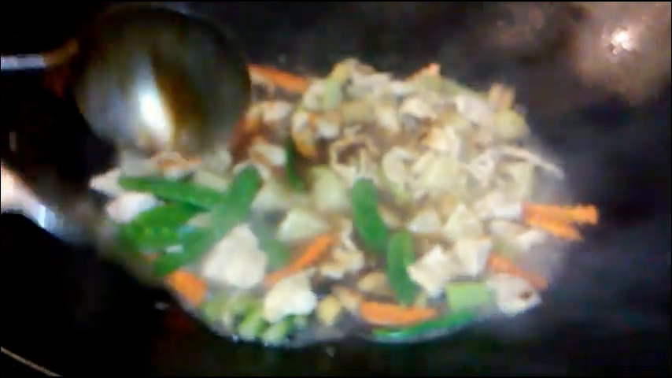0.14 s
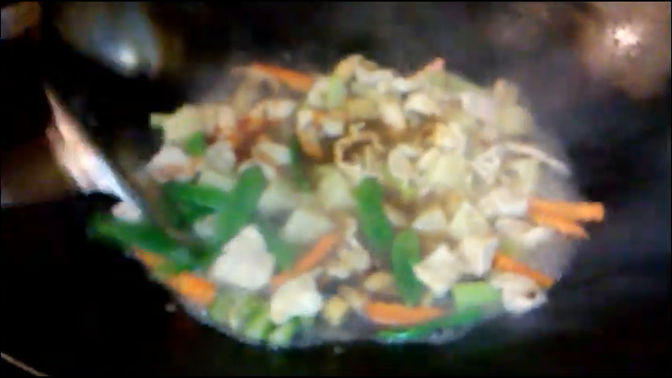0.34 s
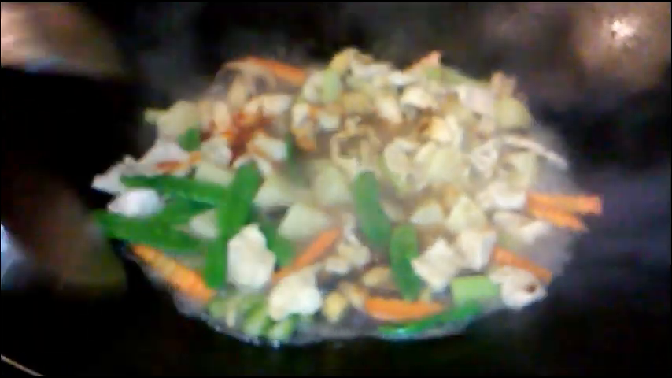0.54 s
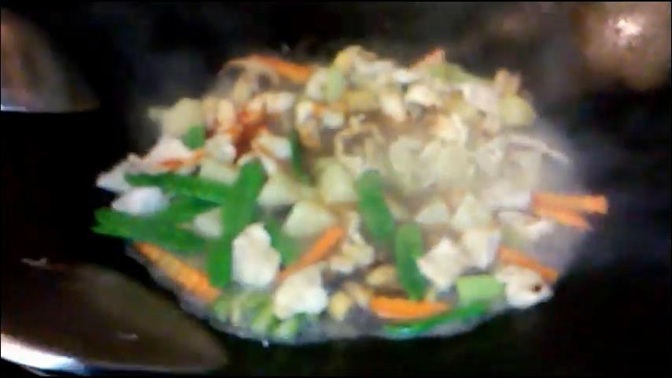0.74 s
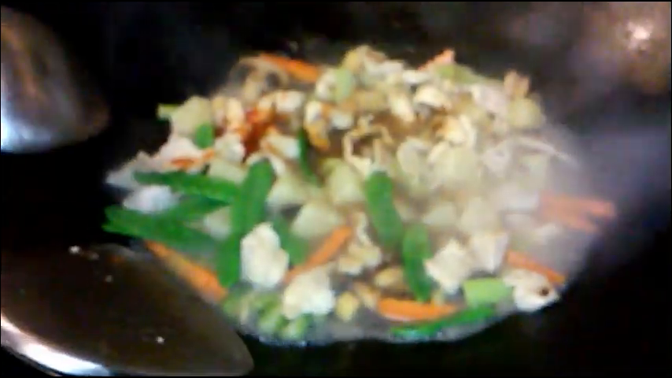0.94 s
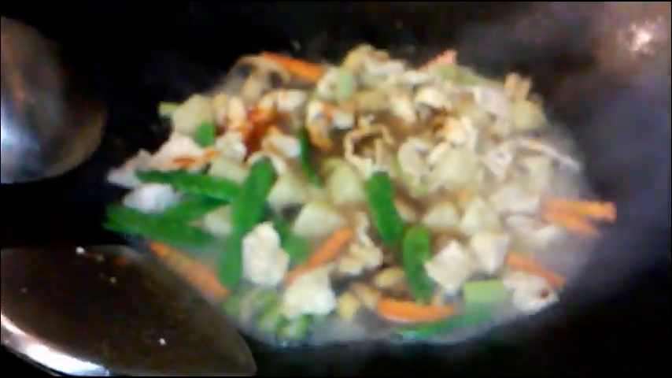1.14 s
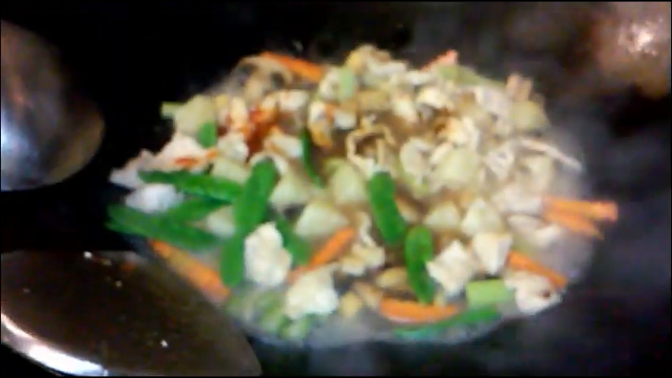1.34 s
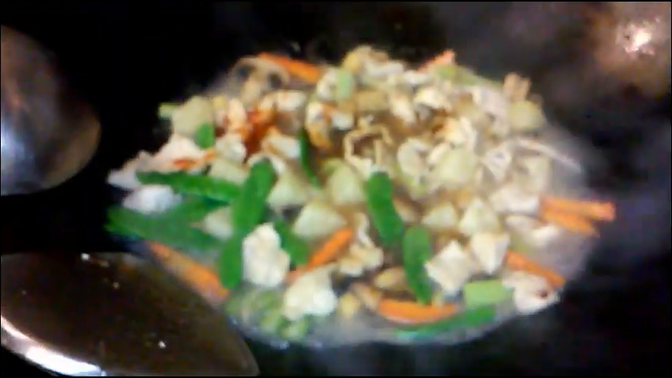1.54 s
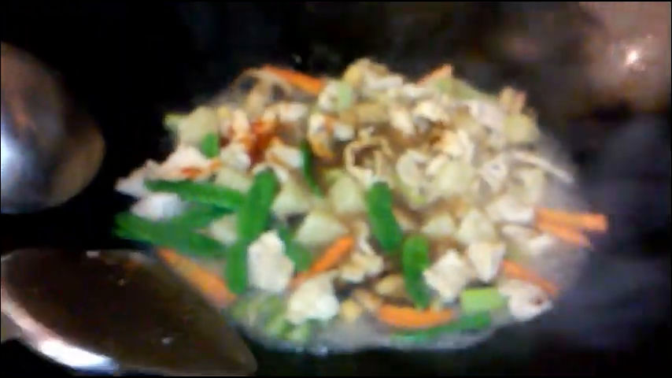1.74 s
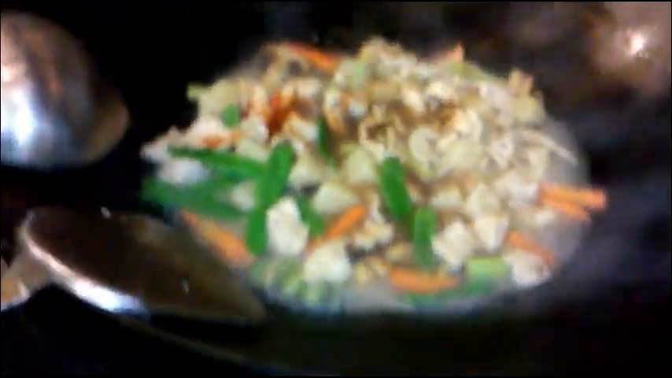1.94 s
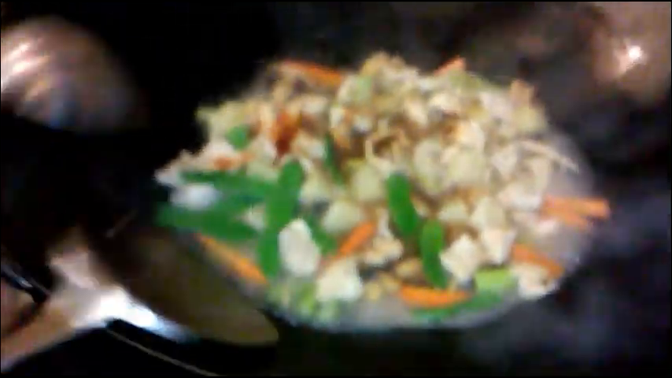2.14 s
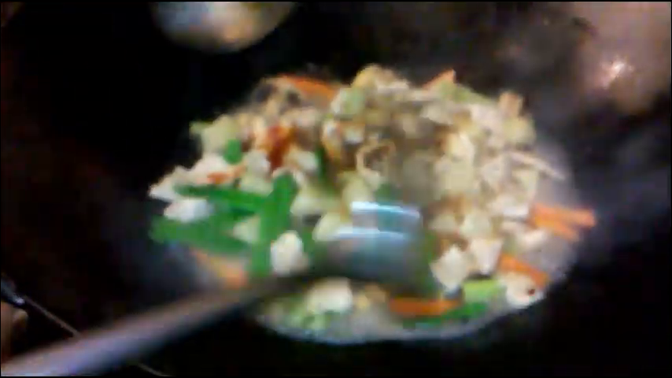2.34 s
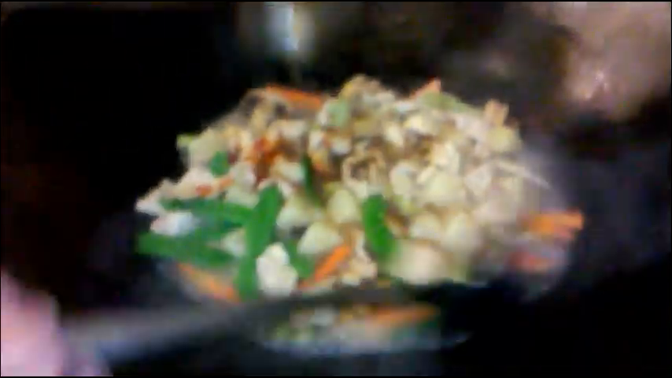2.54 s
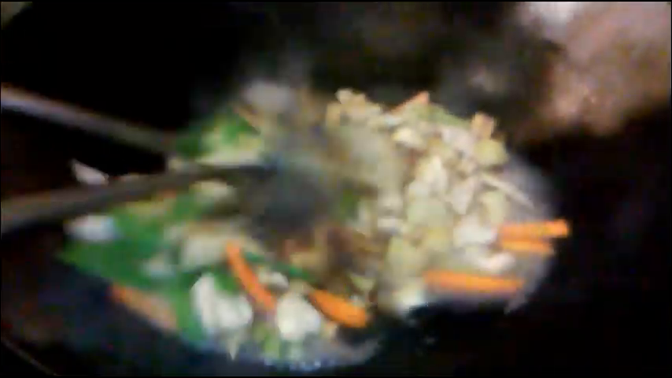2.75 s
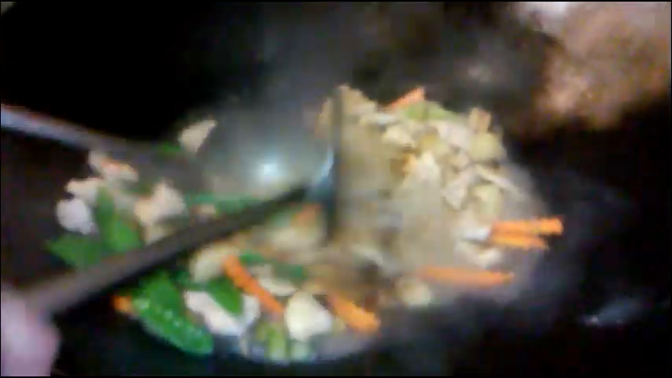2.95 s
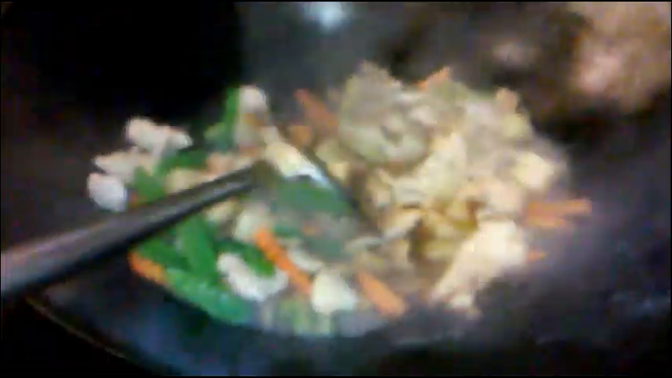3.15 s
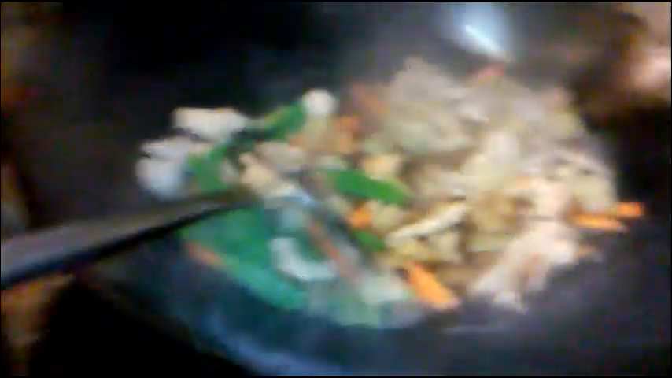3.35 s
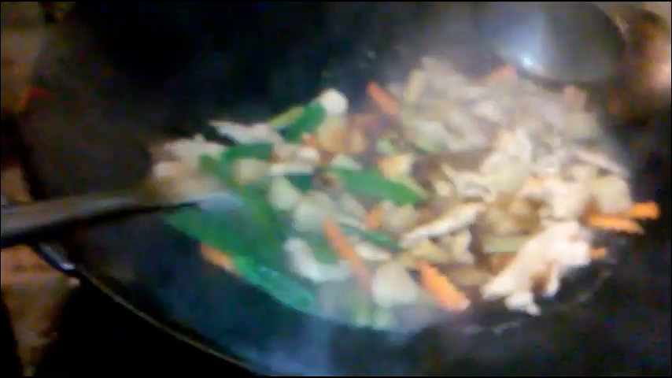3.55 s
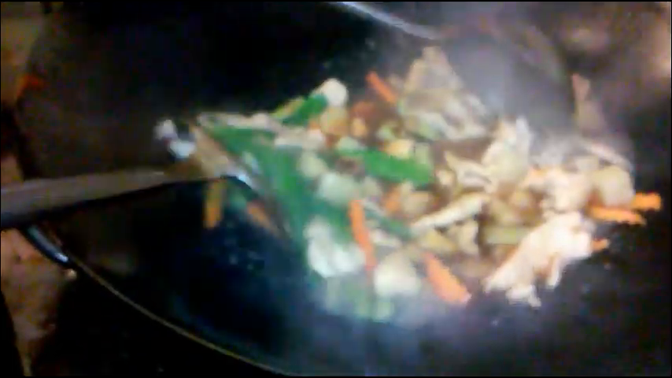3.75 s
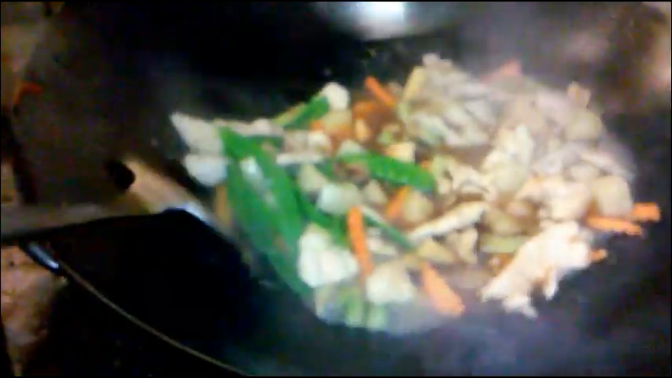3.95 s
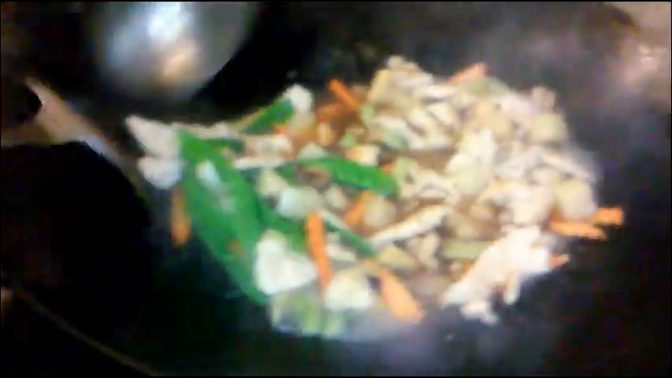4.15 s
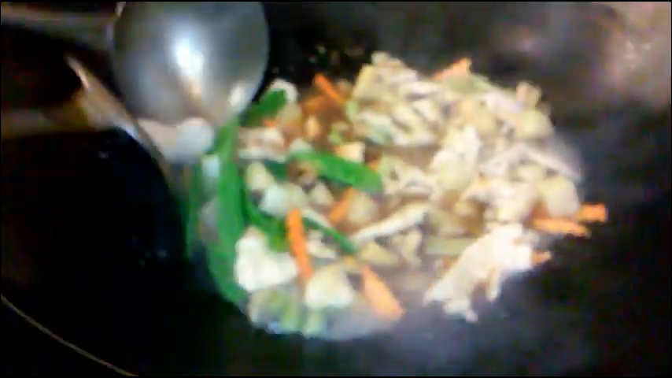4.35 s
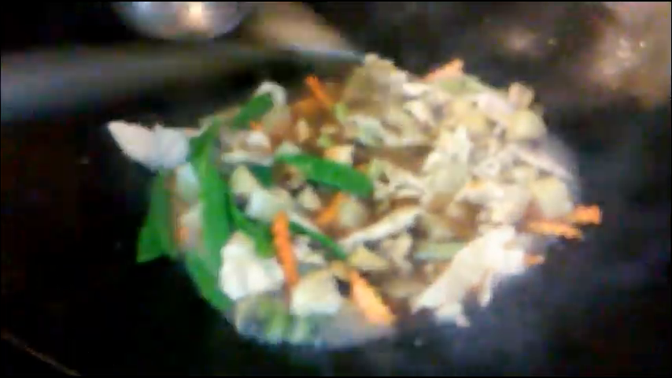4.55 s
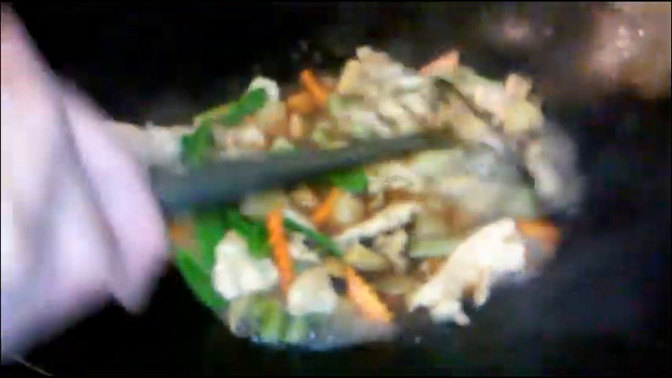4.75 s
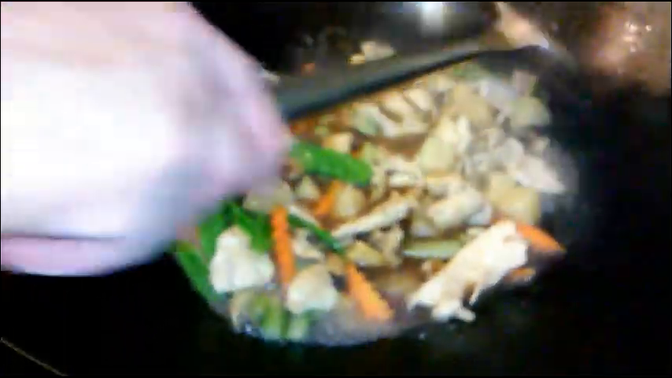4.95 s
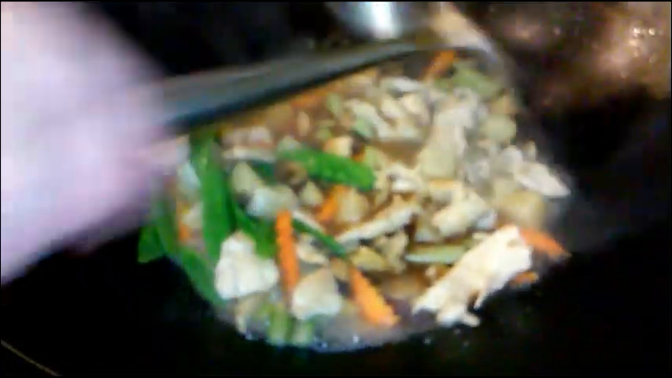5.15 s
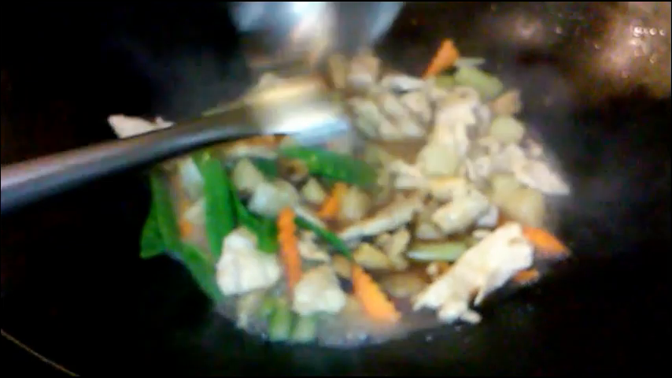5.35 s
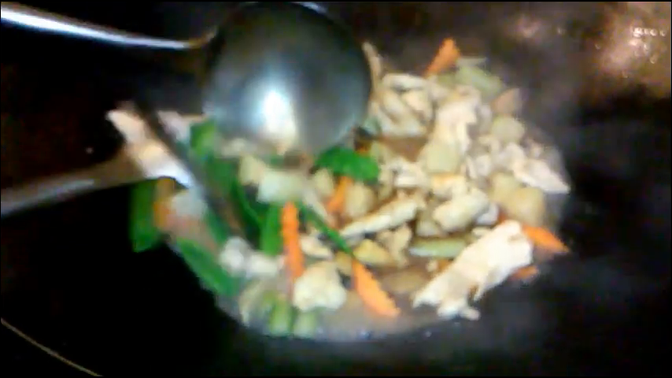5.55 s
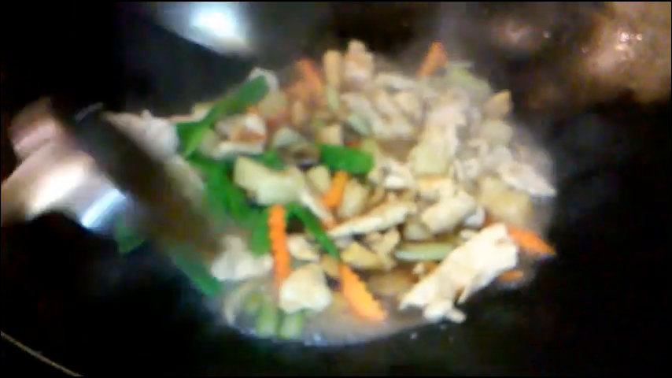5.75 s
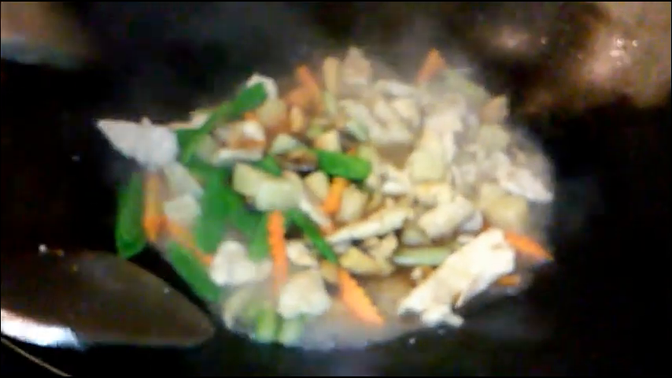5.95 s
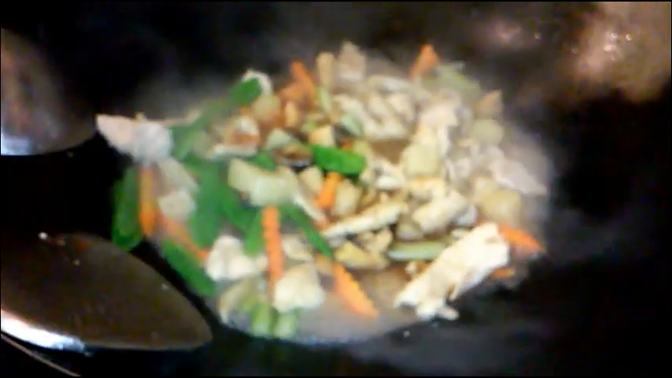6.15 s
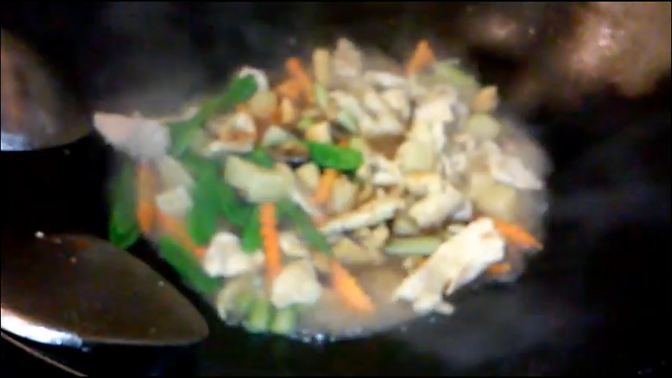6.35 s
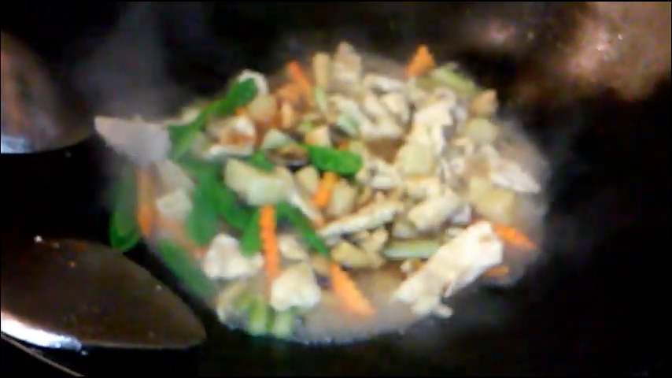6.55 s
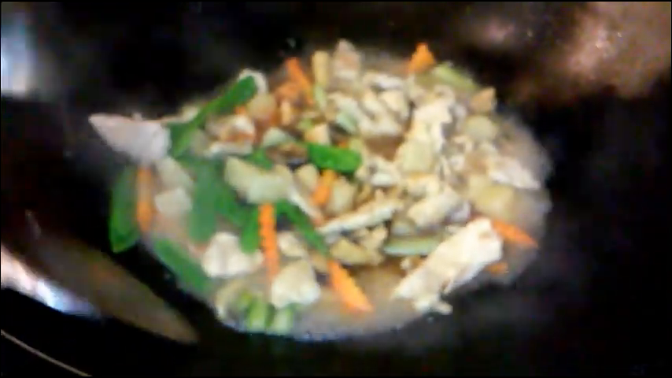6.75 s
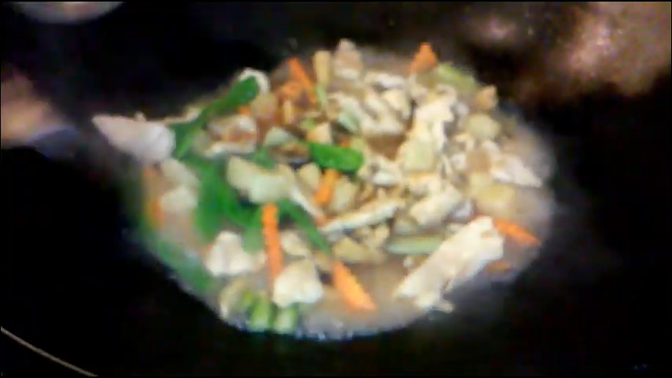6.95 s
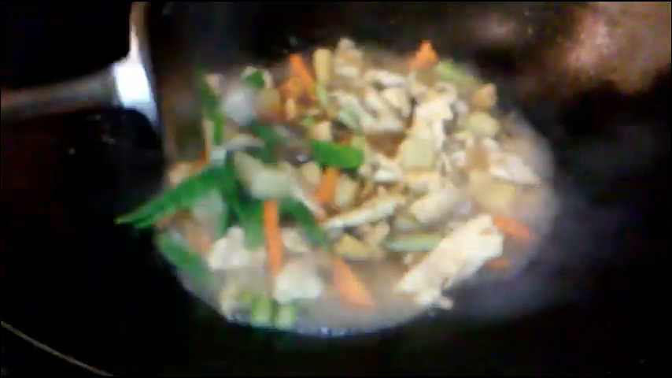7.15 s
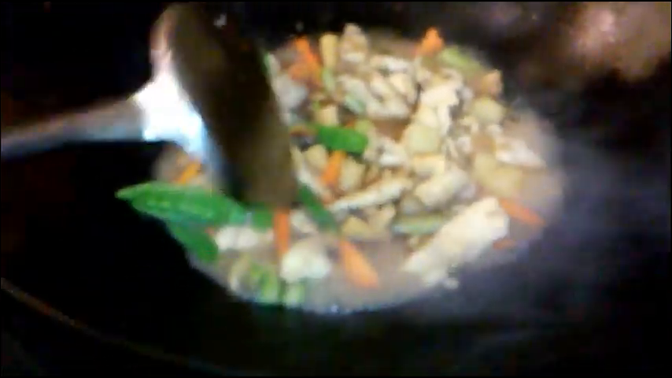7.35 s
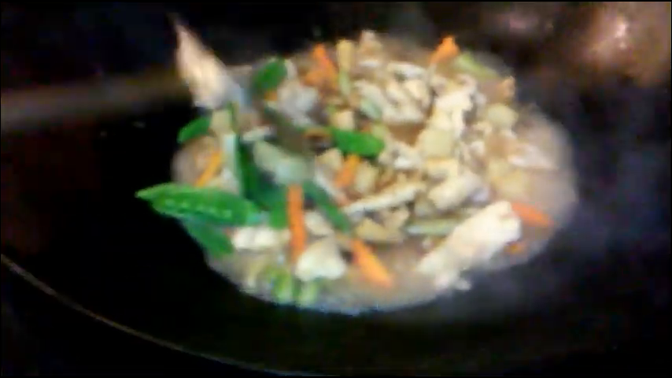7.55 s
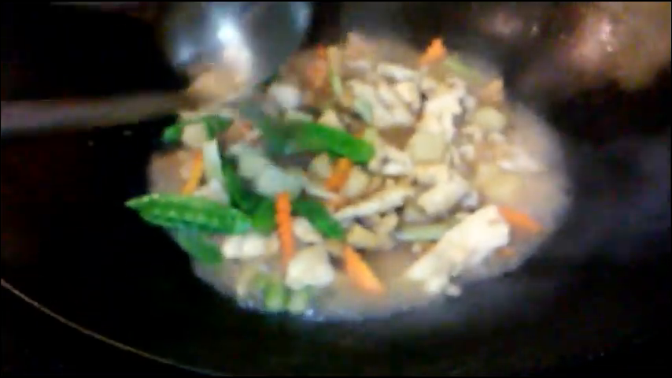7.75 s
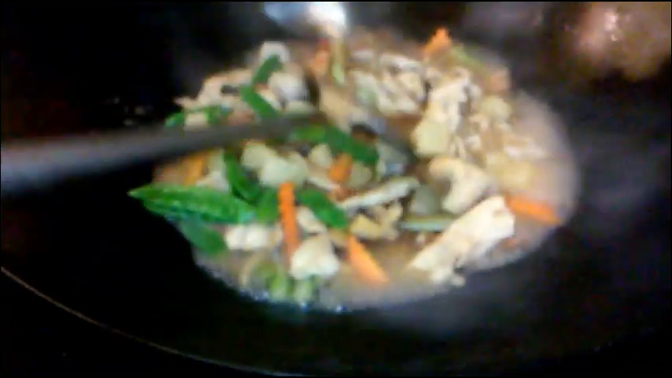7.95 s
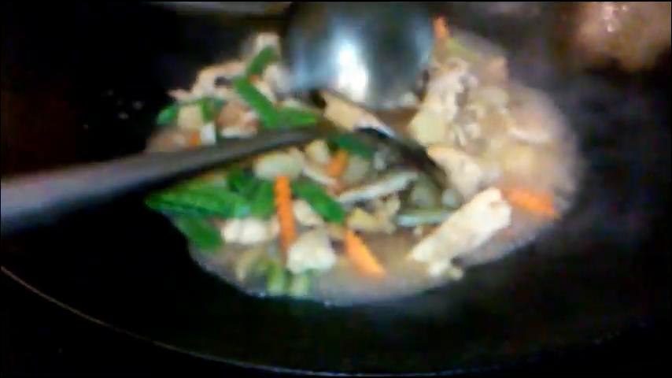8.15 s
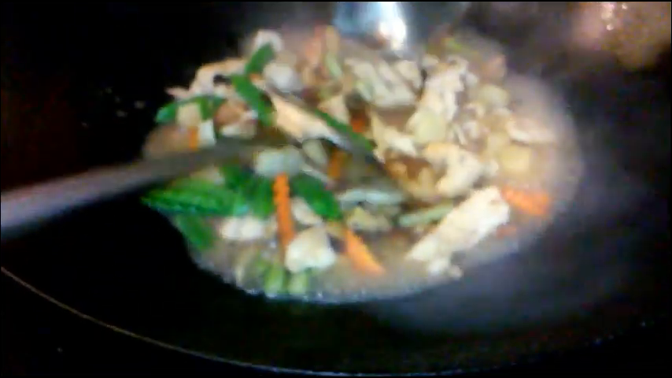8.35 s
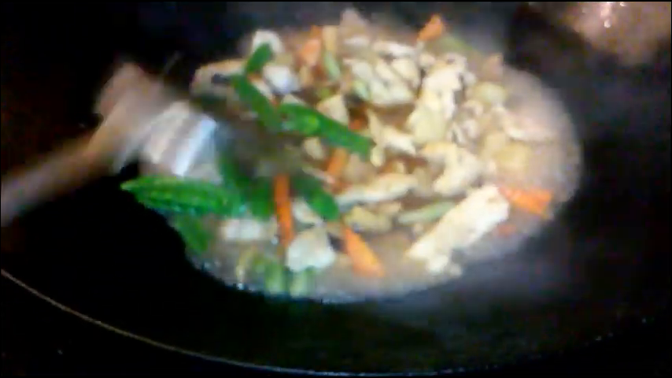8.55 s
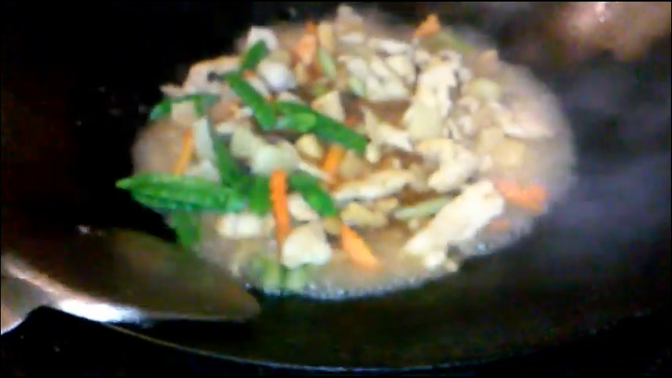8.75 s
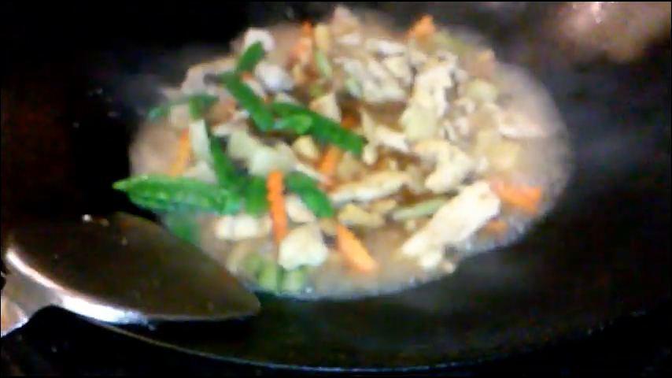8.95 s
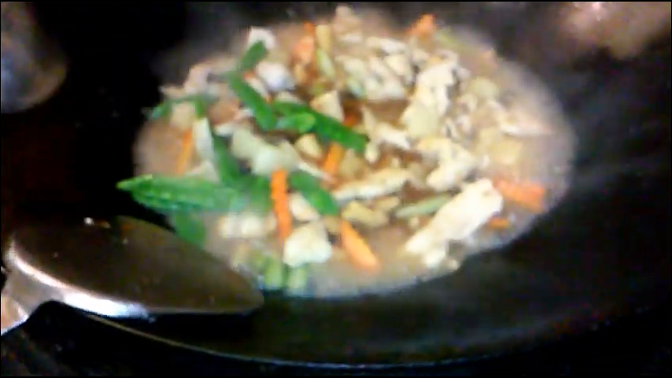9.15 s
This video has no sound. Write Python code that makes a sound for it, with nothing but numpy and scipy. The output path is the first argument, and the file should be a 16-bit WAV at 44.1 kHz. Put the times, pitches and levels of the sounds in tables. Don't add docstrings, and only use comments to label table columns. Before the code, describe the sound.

Close to a steel wok, vegetables fry with a bright, bubbling sizzle above a low, lumpy burner roar. A spatula and ladle clank and scrape at once, pause, then hit hard near three seconds as steam flares. More knocks follow around four to six seconds, a short squeal just before and after seven, and hard closing blows. Oil spits throughout; the small mono microphone overloads on the loudest hits.

```python
import sys
import numpy as np
from scipy import signal
from scipy.fft import rfft, irfft, next_fast_len
from scipy.io import wavfile
from scipy.ndimage import uniform_filter1d

SR = 44100
rng = np.random.default_rng(int(sys.argv[2]) if len(sys.argv) > 2 else 0)


def voltage_ratio(decibels):
    exponent = np.asarray(decibels, float) / 20
    return 10 ** exponent


def transcribe(u):
    v = np.clip(np.atleast_2d(u).T, -1, 1)
    q = np.round(v * 32767).astype(np.int16)
    wavfile.write(sys.argv[1], SR, q)


N = 406161


def evened(x):
    return x / np.sqrt(np.mean(x ** 2) + 1e-20)


def read(points, hz):
    f, value = np.transpose(points)
    return np.interp(np.log(hz + 1), np.log(f + 1), value)


def add(mix, s, sound):
    part = mix[round(s * SR):][:len(sound)]
    part += sound[:len(part)]


def coloured(x, spectrum):
    size = next_fast_len(len(x))
    hz = np.fft.rfftfreq(size, 1 / SR)
    inside = (hz > spectrum[0][0]) & (hz < spectrum[-1][0])
    shaped = irfft(rfft(x, size) * voltage_ratio(read(spectrum, hz)) * inside, size)
    return evened(shaped[:len(x)])


def crackle(count, per_s, spread_db):
    out = np.zeros(count)
    at = np.flatnonzero(rng.random(count) < per_s / SR)
    size_db = spread_db * np.minimum(rng.exponential(1, len(at)), 5)
    out[at] = voltage_ratio(size_db) * rng.standard_normal(len(at))
    return out


def wander(size):
    return evened(uniform_filter1d(uniform_filter1d(rng.standard_normal(N), size), size))


def bent(sound, shake_db):
    bend = .012
    return np.interp(np.cumsum(1 + bend * shake_db[::-1]), np.arange(len(sound)), sound)


def sing(x, hz, width):
    turn = np.exp(2j * np.pi * np.cumsum(hz) / SR)
    r = np.exp(-np.pi * width / SR)
    return (turn * signal.lfilter([1], [1, -r], x / turn)).real * 2 * np.sqrt(1 - r)


def kitchen(x):
    t = np.arange(15000) / SR
    taps = rng.choice([-1., 1.], len(t)) * (rng.random(len(t)) < .05) * (t > .004)
    low = signal.lfilter([.35], [1, -.65], taps)
    tail = low * voltage_ratio(-60 * t / 0.35) + (taps - low) * voltage_ratio(-60 * t / 0.65)
    return signal.oaconvolve(x, tail / np.linalg.norm(tail))[:N]


def burner():
    # (time [s], level [dB])
    flame_levels = [(0.0, -34), (1.67, -34.5), (2.25, -33), (2.72, -36.5), (4.95, -34), (5.67, -36.5),
                    (5.9, -30.5), (6.44, -36), (7.46, -33.5), (8.41, -32), (9.0, -35), (9.21, -25.5)]
    # (frequency [Hz], level [dB per Hz])
    roar_spectrum = [(11, -38), (18, -8.5), (54, -8), (134, -3.5), (199, -9.5), (220, -19), (244, -12),
                     (264, -41), (297, -15.5), (334, -34), (365, -25), (400, -28), (520, -31), (880, -120)]
    # (time [s], peak [dB], frequency [Hz])
    flame_puffs = [
        (2.368, -10, 125),
        (7.125, -20.5, 127),
        (8.108, -14.5, 137.5),
        (8.39, -15, 93),
        (8.454, -14.5, 94),
        (8.606, -17, 102),
    ]
    s, level_db = np.transpose(flame_levels)
    lumps_db = 1.8 * wander(size=1200)
    level_db = np.interp(np.arange(N) / SR, s, level_db) + 1.5 + lumps_db
    out = voltage_ratio(level_db) * coloured(rng.standard_normal(N), roar_spectrum)
    t = np.arange(5000) / SR
    for start, db, hz in flame_puffs:
        swell = t / 0.01 * np.exp(-t / 0.011)
        add(out, start, voltage_ratio(db + 3.5) * swell * np.sin(2 * np.pi * hz * t))
    return out


def boiling():
    # (peak time [s], fizz level [dB], rise [dB per s], fall [dB per s])
    flare_ups = [(0.1, -25.5, 5, 27), (0.6, -31.5, 19, 9), (1.46, -31, 8, 36), (2.5, -33.5, 6.5, 6),
                 (2.88, -12.5, 106, 10), (3.33, -18.5, 24, 25), (3.95, -23.5, 40, 9.5), (5.1, -31, 19, 18),
                 (6.2, -20.5, 89, 15), (6.97, -23, 147, 34), (7.68, -24, 100, 20), (8.44, -30, 28, 5),
                 (8.85, -22, 23, 38)]
    quiet_fizz_db = -62
    t = np.arange(N) / SR
    heat = voltage_ratio(quiet_fizz_db) ** 2
    for s, db, rise, fall in flare_ups:
        heat = heat + voltage_ratio(db - np.maximum(rise * (s - t), fall * (t - s))) ** 2
    return 10 * np.log10(heat)


def sizzle(fizz_db):
    # (frequency [Hz], level [dB per Hz])
    fizz_spectrum = [(2650, -18.5), (4500, -27), (6680, -2), (7250, 1.5), (8410, 3), (9310, 0.5),
                     (11500, 1), (12400, 0), (16200, -23), (22000, -120)]
    # (frequency [Hz], level [dB per Hz])
    flare_spectrum = [(1530, 2.5), (2600, -2), (2940, -9.5), (4380, -4), (5370, -0.5), (7000, -7.5),
                      (9100, -70), (15400, -120)]
    # (time [s], peak [dB], decay time T60 [s])
    juice_spurts = [
        (1.0394, -40, 0.81),
        (1.1777, -16.5, 0.21),
        (1.925, -8, 0.23),
        (2.152, -36.5, 0.39),
        (5.664, -17, 0.98),
        (7.487, -8.5, 0.99),
        (8.2656, -11, 0.75),
    ]
    flare_db = np.maximum(-39 + 1.61 * (fizz_db + 25), -48)
    gusts = wander(size=500)
    pops = evened(crackle(N, 5000, 2.2)) * 0.6 + rng.standard_normal(N) + .18 * evened(crackle(N, 150, 1.8))
    spurts = np.zeros(N)
    for start, db, t60 in juice_spurts:
        add(spurts, start, voltage_ratio(db - 19.5 - 60 * np.arange(20000) / SR / t60))
    fizz = (voltage_ratio(fizz_db + 1.0 * gusts) + spurts) * coloured(pops, fizz_spectrum)
    flare = (voltage_ratio(flare_db + 0.71 * gusts) + 0.23 * spurts) * coloured(pops, flare_spectrum)
    return fizz + flare


def sauce(steel, tools, fizz_db):
    # (frequency [Hz], level [dB per Hz])
    simmer_spectrum = [(160, -2), (280, 0.5), (332, -21), (370, -9), (567, -12), (604, 0), (658, -10.5),
                       (1200, -5.5), (1420, -5.5), (2300, -2.5), (2640, -14.5), (3600, -9.5), (4680, -22),
                       (7920, -120)]
    # (frequency [Hz], level [dB per Hz])
    slosh_spectrum = [(700, -40), (900, -6), (1300, 0), (2400, 0), (2900, -8), (4500, -14), (8000, -60)]
    simmer = voltage_ratio(-35 + 0.26 * (fizz_db + 20))
    settle = np.exp(-1 / (0.033 * SR))
    slosh = voltage_ratio(-21.5) * np.sqrt(signal.lfilter([1 - settle], [1, -settle], tools ** 2))
    t = np.arange(500) / SR
    plops = rng.standard_normal(N)
    for hz in np.geomspace(800, 2600, 16):
        plop = np.sin(2 * np.pi * hz * t) * np.exp(-t * hz / 6)
        busy = np.repeat(voltage_ratio(3 * rng.standard_normal(N // 2048 + 1)), 2048)[:N]
        plops += .17 * evened(signal.oaconvolve(crackle(N, 250, 2) * busy, plop)[:N])
    bowl = struck(steel, rng.standard_normal(len(steel[0])), 1318, 2246, 2630)[1:3].sum(0)
    plops = evened(plops) + .2 * evened(signal.oaconvolve(plops, bowl)[:N])
    swell_db = 1.3 * wander(size=900)
    return voltage_ratio(swell_db) * (simmer * coloured(plops, simmer_spectrum) + slosh * coloured(plops, slosh_spectrum))


def spitting():
    # (time [s], peak [dB])
    oil_bursts = [(0.3945, -9), (0.5661, -10), (1.7729, -18), (1.99, -18), (2.226, -14), (5.443, -15),
                  (8.7864, -5), (1.1777, -10), (1.4466, -12), (1.925, -4.5), (2.0634, -12), (2.2543, -15),
                  (2.483, -11), (5.2285, -10), (7.3644, -22), (7.4854, -8), (7.8138, -6), (8.2676, -5.5),
                  (8.3809, -10.5), (8.5026, -6), (8.694, -5)]
    out = np.zeros(N)
    t = np.arange(300) / SR
    splash = np.diff(rng.standard_normal((len(oil_bursts), 302)), 2) * np.exp(-t / .002)
    click = np.sin(2 * np.pi * 8000 * t) * np.exp(-((t - .0002) / 0.00018) ** 2)
    for (s, db), spray in zip(oil_bursts, splash):
        add(out, s, voltage_ratio(db - 2.5) * (click + 0.076 * spray))
    return out


def wok():
    # (frequency [Hz], level [dB])
    strong_modes = [(253, -10), (431, -10), (470, 14), (614, -3), (742, 12), (880, 18), (1021, 17),
                    (1152, 10), (1265, 16), (1330, 21), (1442, 15.5), (1567, 12), (1626, 10.5), (2412, 5),
                    (2454, 5), (2650, 4), (2745, 2), (2884, -5), (3200, -1.5), (3800, -15), (4134, 7),
                    (4950, -24)]
    # (frequency [Hz], level [dB per Hz])
    steel_spectrum = [(120, -41), (200, -2), (268, -26), (428, -10), (509, -12.5), (757, -10), (1130, -6.5),
                      (1620, -7.5), (2170, 0), (2490, 3.5), (2850, 2), (3150, -3), (3580, -6), (4890, -7.5),
                      (10600, -6), (12400, -5.5), (16200, -53), (22000, -120)]
    # (frequency [Hz], decay time T60 [s])
    ring_times = [(250, 0.64), (1000, 0.16), (2600, 0.2), (4000, 0.12), (12000, 0.075)]
    thicket = np.geomspace(220, 12400, 600) * rng.uniform(1.0, 1.005, 600)
    strong_hz, strong_db = np.transpose(strong_modes)
    hz = np.r_[strong_hz, thicket]
    level_db = np.r_[strong_db, np.zeros(600) + 1.5] + read(steel_spectrum, hz) + 10 * np.log10(hz)
    t = np.arange(11000, dtype=np.float32) / SR
    t60 = read(ring_times, hz) * rng.uniform(0.4, 1.5, len(hz))
    start = rng.uniform(0, 2 * np.pi, len(hz))
    hz32, t60, start = (v.astype(np.float32)[:, None] for v in (hz, t60, start))
    rings = np.sin(2 * np.pi * hz32 * t + start) * np.exp(-np.log(1000) * t / t60)
    return hz, voltage_ratio(level_db), rings


def struck(steel, luck, *favoured_hz, lift_db=13):
    part_borders = [0, 840, 2000, 3500, 20000]
    hz, gain, rings = steel
    near = voltage_ratio(sum(lift_db * np.exp(-((hz / f - 1) / .07) ** 2) for f in favoured_hz))
    parts = np.digitize(hz, part_borders) == np.arange(1, len(part_borders))[:, None]
    spot = np.sign(luck) * voltage_ratio(3 * abs(luck))
    sound = (parts * gain * near * spot).astype(np.float32) @ rings
    return sound / np.sqrt(np.mean(sound[:, :600] ** 2, axis=1, keepdims=True))


def squeal():
    # (time [s], frequency [Hz], tone level [dB], upper ring level [dB])
    squeal_glide = [
        (6.92, 1300, -24, -24),
        (6.935, 1320, -27, -17),
        (6.96, 1350, -21, -22),
        (6.99, 1390, -20, -23),
        (7.006, 1330, -33, -21),
        (7.03, 1260, -24, -19),
        (7.055, 1240, -13.5, -24),
        (7.078, 1200, -26, -25),
        (7.105, 1120, -28, -30),
        (7.13, 1100, -45, -42),
    ]
    s, hz, db, upper_db = np.transpose(squeal_glide)
    t = np.arange(s[0], s[-1], 1 / SR)
    hz = np.interp(t, s, hz)
    slips = rng.standard_normal(len(t))
    tone = .6 * evened(sing(slips, hz, 40)) + np.sin(2 * np.pi * np.cumsum(hz) / SR)
    ring_hz = 2620 + .4 * (hz - hz[0])
    ring = evened(sing(sing(slips, ring_hz, 400), ring_hz, 300))
    both = voltage_ratio(np.interp(t, s, db)) * tone + voltage_ratio(np.interp(t, s, upper_db)) * ring
    return s[0], both * signal.windows.tukey(len(t), .05)


def ladle():
    # (time [s], frequency [Hz], peak [dB], decay time T60 [s])
    clear_tones = [(2.101, 2464, -22, .3), (2.181, 2250, -16, .15), (4.16, 2400, -23.5, .3),
                   (4.19, 1280, -18, 0.37), (4.192, 1817, -22.5, 0.41), (4.195, 2773, -18, 0.11),
                   (4.283, 2420, -4, 0.11), (4.29, 1270, -13.5, 0.25), (4.326, 1560, -10.5, 0.14),
                   (6.72, 1630, -19, 0.3), (6.726, 2420, -17, 0.23), (6.782, 1630, -14, 0.33),
                   (6.785, 1053, -17, 0.36), (6.88, 2450, -26, .5), (5.092, 253, -19.5, 0.21),
                   (5.095, 414, -13, .12), (0.497, 606, -11, 0.38), (0.51, 378, -9.5, 0.22),
                   (6.02, 438, -9, 0.17), (4.3, 2720, -13, 0.3), (4.192, 3950, -13.5, 0.06),
                   (5.966, 2450, -6, .2), (5.935, 2760, -9, .15), (4.822, 2400, -12, .15),
                   (0.69, 3250, -15, .12), (0.74, 2750, -9, .2), (2.647, 2600, -8, .1),
                   (1.092, 2000, -24, .2), (1.11, 1290, -30, .5), (2.188, 2750, -14, .12),
                   (8.79, 3200, -16, .15)]
    # (start [s], length [s], frequency [Hz], level [dB])
    edge_songs = [
        (2.61, 0.045, 5000, -23),
        (2.6, .06, 7300, -20.5),
        (2.61, .045, 6500, -27),
        (2.615, .045, 9500, -23),
        (2.56, 0.11, 1550, -23),
        (4.82, 0.07, 1150, -24),
        (2.02, .05, 1250, -30),
        (1.8, 0.046, 860, -39),
        (2.1, .04, 870, -29),
    ]
    muffle_s = .11
    sharpness = 40
    out = np.zeros(N)
    t = np.arange(11000) / SR
    noise = rng.standard_normal((len(clear_tones), len(t)))
    waver_db = 2.8 * uniform_filter1d(noise, size=300) * np.sqrt(300)
    for (s, hz, db, t60), shake_db in zip(clear_tones, waver_db):
        level_db = db + shake_db - 60 * t / t60 - 20 * (t / muffle_s) ** 3
        rise = 1 - np.exp(-t / 0.0012)
        add(out, s, voltage_ratio(level_db) * rise * bent(np.sin(2 * np.pi * hz * t), .3 * shake_db))
    song_slips = rng.standard_normal((len(edge_songs), len(t)))
    for (s, length, hz, db), slips in zip(edge_songs, song_slips):
        slide = np.clip(np.minimum(t, length - t) / 0.019, 0, 1)
        add(out, s, voltage_ratio(db) * slide * sing(slips, hz + 0 * t, hz / sharpness))
    return out


def scrape(start, length, pressure_db, change_db, deep_db, low_hz, upper_hz, upper_db, steel):
    touch_s, lift_db_per_s = 0.0045, 262
    t = np.arange(17000) / SR
    db = pressure_db + change_db * np.minimum(t / length, 1) - lift_db_per_s * np.maximum(t - length, 0)
    bright_db = upper_db + 0.16 - 0.56 * (deep_db + 37)
    slips = evened(crackle(len(t), 2000, 2.13)) * np.minimum(t / touch_s, 1)
    damping = voltage_ratio(-60 * np.arange(6000) / SR / .06)
    luck = rng.standard_normal(len(steel[0]))
    rings = struck(steel, luck, low_hz, upper_hz, lift_db=7.0)[:, :6000] * damping
    drive = slips * voltage_ratio([db + deep_db, db - 2.5, db + upper_db, db + bright_db])
    rings = rings / np.linalg.norm(rings, axis=1, keepdims=True)
    return start, signal.fftconvolve(drive, rings, axes=1).sum(0)


def scrapes(steel):
    # (start [s], length [s], pressure
    # [dB], change over the stroke [dB], deep part [dB])
    blade_strokes = [(0.489, 0.093, -8, -14, -5), (0.635, .2, -13.5, 0.1, -13), (2.1, .09, -25, 2, -18.5),
                     (2.55, 0.088, -25, 0, -26), (2.81, .06, -7.5, -17, -16.5),
                     (2.866, 0.27, -25.5, 3.8, -50), (4.0, 0.057, -35.5, 8, -22),
                     (4.282, 0.037, -18, 2.2, -31.5), (5.929, 0.069, -11, -0.5, -18.5),
                     (5.989, 0.12, -9, -3, -6), (6.116, 0.062, -16.5, -0.5, -28),
                     (6.714, 0.03, -22, -4.5, -25), (6.871, 0.11, -38, -2, -25),
                     (7.04, 0.025, -32, -3, -36), (8.73, 0.047, -16.5, -6, -1),
                     (8.773, 0.081, -20.5, 10.5, -8), (9.108, .11, -6, -1.5, -9.5),
                     (8.2, 0.26, -33.5, -4.5, -28), (2.015, .055, -27, 0, -22), (1.1, .1, -33, -2, -15),
                     (5.09, .06, -20, -10, -22)]
    # (low ring [Hz], upper ring [Hz], upper ring level [dB])
    stroke_rings = [(1100, 2800, 0), (1630, 2540, -4.3), (1300, 2550, -3), (1600, 2600, 10.5),
                    (1620, 2080, -1.8), (1590, 2150, 0.1), (1500, 2760, 6), (1270, 2420, 2.5),
                    (1620, 2760, 4), (1610, 2500, -1.5), (1600, 2500, -13), (1620, 2540, 8),
                    (1320, 2700, -4), (1290, 2600, 5), (1620, 2550, 9), (1620, 2570, -1.5),
                    (1410, 2640, -0.4), (1930, 2150, -9), (1350, 2500, -9), (1300, 2450, 2),
                    (1100, 3050, 4)]
    out = np.zeros(N)
    for stroke, favoured in zip(blade_strokes, stroke_rings):
        add(out, *scrape(*stroke, *favoured, steel))
    return out


def knocks(steel):
    # (time [s], low ring peak [dB], upper ring [dB re low], low ring [Hz], upper ring [Hz])
    tool_taps = [(0.063, -4.5, 2, 1250, 2750), (0.635, -10, 0, 950, 2900), (0.687, -5, 3, 1640, 2520),
                 (1.091, -23, 3, 1300, 2560), (1.722, -25, -4, 1000, 2390), (1.82, -25, -20, 1560, 2190),
                 (2.018, -22, -19, 1300, 2230), (2.103, -17.5, -7, 1620, 2440), (2.179, -13, 1, 1500, 2710),
                 (2.645, -33, 11, 1850, 2620), (3.668, -31.5, 12, 1290, 2830),
                 (4.021, -23.5, 12, 1640, 2800), (4.192, -12, 5.5, 1270, 2790),
                 (4.284, -11, 8.5, 1340, 2750), (4.329, -20, -16, 1500, 2420), (5.09, -13.5, 8, 1150, 3050),
                 (5.925, -6.5, 1, 1570, 2460), (6.719, -18, 3.5, 1590, 2830), (6.782, -9, -4, 1620, 2790),
                 (6.923, -21, 2, 1270, 2590), (6.962, -17, 6, 1410, 2590), (8.826, -3.5, -10, 1690, 2480),
                 (8.987, -25, -25, 1650, 2520), (9.189, -6, -0.5, 1290, 2510), (0.649, -14, 6, 1600, 2450),
                 (0.79, -11, -6, 1580, 2500), (2.612, -24, 6, 1980, 2300), (4.312, -15, 6, 1290, 2720),
                 (6.11, -12, 2, 1750, 2350)]
    # (time [s], peak [dB], deep [dB re peak], upper [dB re peak], bright [dB re peak])
    flat_blows = [(0.045, -17.5, -29, -4, 6), (0.49, -7, 0, -1, 2.5), (0.607, -13, -5, -6, -10),
                  (0.726, -4, -8, 5.5, -3), (2.545, -12, -34, 8.5, 7), (2.806, -2, -19, -4.5, -13),
                  (3.082, -7, -44, -3, 3.5), (4.814, -7.5, -15.5, 3.5, 4), (5.088, -3.5, -10.5, -7, -0.5),
                  (5.952, -14, -20, 8, 11), (6.019, -2, 0.5, -7, -8), (6.119, -7, -15, -2, -9),
                  (6.784, -7.5, -11.5, -16, -19), (8.724, -7.5, 1.5, 4.5, 1.5), (9.11, -2, -3.5, -18, -6)]
    tap_t60, blow_t60 = 0.45, 0.5
    out = np.zeros(N)
    t = np.arange(steel[2].shape[1]) / SR
    rows = []
    for s, db, up, *hz in tool_taps:
        bright_db = db + up + 2.1 + 0.54 * db
        rows.append((s, [db - 22, db, db + up, bright_db], tap_t60, hz))
    for s, db, deep, up, top in flat_blows:
        rows.append((s, [db + deep, db, db + up, db + top], blow_t60, []))
    luck = rng.standard_normal((len(rows), len(steel[0])))
    rattle_db = 2.2 * uniform_filter1d(rng.standard_normal((len(rows), len(t))), size=150) * np.sqrt(150)
    rise = 1 - np.exp(-t / np.array([[.006], [.0015], [.001], [.0005]]))
    for (s, parts_db, t60, hz), spot, shake_db in zip(rows, luck, rattle_db):
        ring = voltage_ratio(parts_db) @ (struck(steel, spot, *hz) * rise)
        add(out, s, voltage_ratio(-5.5 + shake_db - 60 * t / t60) * bent(ring, shake_db))
    return out


def scene():
    steel = wok()
    tools = knocks(steel) + scrapes(steel)
    add(tools, *squeal())
    tools = tools + ladle()
    fizz_db = boiling()
    frying = sizzle(fizz_db) + sauce(steel, tools, fizz_db)
    mono = tools + voltage_ratio(-9.0) * kitchen(tools) + frying + spitting() + burner()
    return np.array([mono, mono])


def low_pass(x):
    return signal.sosfilt(signal.butter(12, 12590, fs=SR, output="sos"), x)


def record(dry):
    overloaded = np.clip(dry, -.95, .95)
    lowpass = signal.firwin(401, 12500, window=("kaiser", 9), fs=SR)
    limited = signal.oaconvolve(overloaded, lowpass[None], "same")
    top_band = signal.firwin(201, [10900, 11800], pass_zero=False, fs=SR)
    top = signal.oaconvolve(np.roll(limited[0], 700), top_band, "same")
    patches = np.repeat(rng.random(N // 2048 + 1) < .6, 2048)[:N]
    apart = voltage_ratio(-17.5) * top * patches
    finished = np.clip(limited + [apart, -apart], -1, 1)
    return low_pass(finished)


dry = scene()
out = record(dry)
transcribe(out)
```